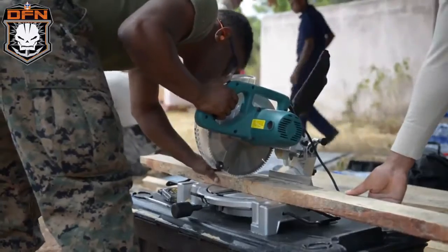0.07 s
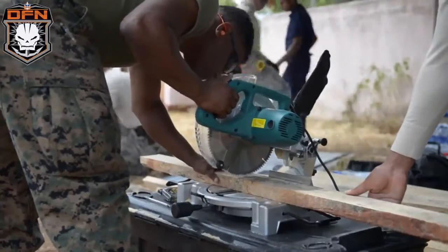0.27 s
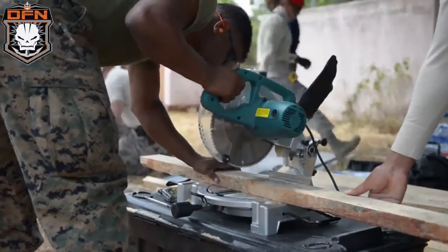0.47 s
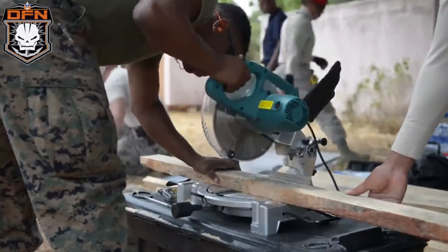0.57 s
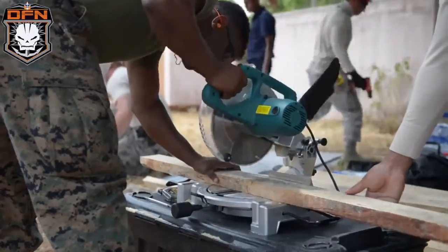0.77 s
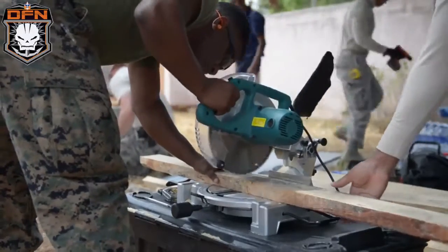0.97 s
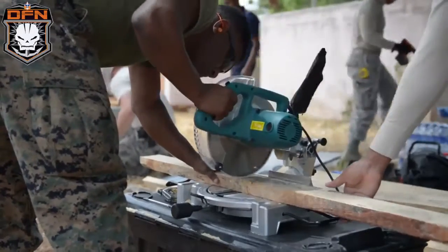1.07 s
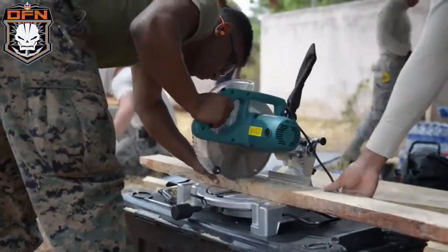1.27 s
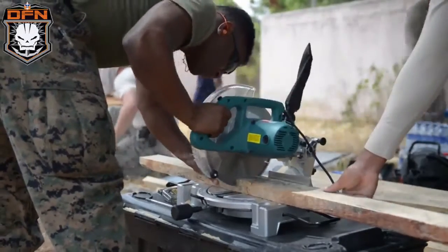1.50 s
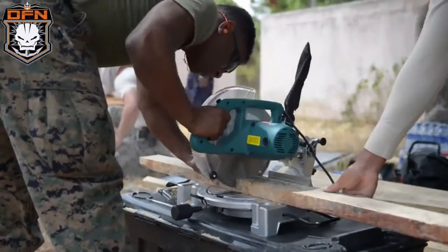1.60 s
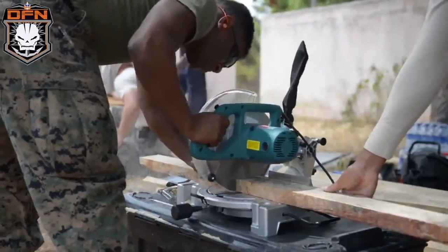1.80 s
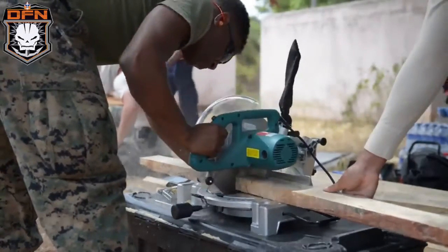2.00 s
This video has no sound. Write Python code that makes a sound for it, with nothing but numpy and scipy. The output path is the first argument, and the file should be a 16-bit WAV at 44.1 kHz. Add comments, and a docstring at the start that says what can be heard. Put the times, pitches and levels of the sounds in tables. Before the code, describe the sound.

An electric miter saw starts up and cuts through a wooden board outdoors.

```python
"""A low outdoor rumble, then an electric miter saw clatters into life and bites through a wooden board.
The inrush current rattles the gears at twice the mains rate, then the motor whines up to speed.
The teeth rasp through the wood, the blade rings, and two resonances fall as the cut deepens."""
import sys
import numpy as np
from scipy import signal
from scipy.fft import rfft, irfft
from scipy.io import wavfile
from scipy.ndimage import uniform_filter1d

SR = 44100
rng = np.random.default_rng(int(sys.argv[2]) if len(sys.argv) > 2 else 0)


def materialize(psi):
    """Save the field psi as 16-bit PCM at rate SR to the path in sys.argv[1].

    A 1-D psi becomes a single channel; in a 2-D psi each row is a channel.
    """
    bounded = np.clip(np.atleast_2d(psi).T, -1, 1)
    quanta = np.round(bounded * 32767).astype(np.int16)
    wavfile.write(sys.argv[1], SR, quanta)


N = 90228
T = np.arange(N) / SR
START_S = .612   # the motor kicks in

# rate of the motor's torque pulses, sagging under the inrush: time_s, rate_hz
TORQUE_PULSES = [(.612, 102.3), (.66, 98.4), (.72, 93.8), (.85, 98.24), (1.3, 103.4), (1.6, 101.8),
                 (2.05, 104.6)]
# the two resonances of the cut: time_s, lower_hz, lower_db, upper_hz, upper_db
KERF_RESONANCES = [(1.2, 2610, -54, 5900, -46.5), (1.36, 2340, -51, 5420, -42),
                   (1.41, 2200, -49, 4960, -41.5), (1.47, 1960, -42.5, 4510, -49.5),
                   (1.52, 1840, -46.5, 3840, -38.5), (1.58, 1655, -47, 3560, -46),
                   (1.66, 1365, -45, 3370, -45.5), (1.75, 1310, -44, 3230, -45.5),
                   (1.9, 1302, -43, 3130, -52.5), (2.05, 1314, -48, 3330, -39.5)]


def from_db(db):
    """Decibels to gain."""
    return 10 ** (np.asarray(db) / 20)


def rms_one(x):
    """Scale to unit rms."""
    return x / np.sqrt(np.mean(x ** 2) + 1e-20)


def in_time(rows):
    """Each column of a breakpoint curve at every sample."""
    time_s, *columns = np.transpose(rows)
    return [np.interp(T, time_s, column) for column in columns]


def white():
    """Unit white noise."""
    return rng.standard_normal(N)


def colour(x, spectrum):
    """Equalise x along a spectrum; white input keeps its power."""
    hz, db = np.transpose(spectrum)
    f = np.maximum(np.arange(N + 1) * SR / (2 * N), 1)
    gain = from_db(np.interp(np.log(f), np.log(hz), db)) * np.minimum(f / hz[0], 1) ** 2
    return irfft(rfft(x, 2 * N) * rms_one(gain))[:N]


def drift(hz):
    """Random wander of unit rms, mostly slower than hz."""
    f = np.arange(N // 2 + 1) * SR / N
    return rms_one(irfft(rfft(white()) / (1 + (f / hz) ** 2), N))


def cycles(hz):
    """Cycles run through at a steady or moving rate."""
    return np.cumsum(hz * np.ones(N)) / SR


def tone(hz):
    """A steady or gliding sine of unit rms."""
    return np.sqrt(2) * np.sin(2 * np.pi * cycles(hz))


def resonate(x, hz, width_hz):
    """A steady or moving resonance; white input keeps its power."""
    r, turn = np.exp(-np.pi * width_hz / SR), np.exp(2j * np.pi * cycles(hz))
    return np.real(turn * signal.lfilter([np.sqrt(2 * (1 - r * r))], [1, -r], x / turn + 1e-18))


def peak(x, hz, width_hz):
    """A resonance applied twice, for steep flanks; white input keeps its power."""
    r, turn = np.exp(-np.pi * width_hz / SR), np.exp(2j * np.pi * cycles(hz))
    return np.real(turn * signal.lfilter([(2 * (1 - r)) ** 1.5], [1, -2 * r, r * r], x / turn + 1e-18))


def lulls():
    """Gain that ducks the broad rush for an instant, four times during the cut."""
    # dips in level: centre_s, half_width_s, depth_db
    dips = [(1.385, .012, 12), (1.664, .011, 15), (1.769, .014, 17), (1.938, .011, 13)]
    return from_db(-sum(db * np.exp(-((T - s) / width) ** 4) for s, width, db in dips))


def site():
    """Low outdoor rumble, work-site bustle and the wavering drone of a distant machine."""
    # swells of the rumble: time_s, level_db
    rumble_level = [(0, -53.5), (.18, -54), (.25, -49), (.4, -51.5), (.55, -52.5), (.72, -54.5), (.95, -52),
                    (1.18, -65.5), (1.3, -49.5), (1.43, -47.5), (1.58, -66.5), (2.05, -63)]
    # spectra of rumble and bustle: freq_hz, density_db
    rumble_spectrum = [(25, -1), (52, 4.5), (80, 3), (110, -8), (160, -12.5), (400, -54.5)]
    bustle_spectrum = [(110, 0), (200, -6.5), (320, -5), (450, -11.5), (830, -11.5), (1150, -8.5),
                       (1400, -19), (3600, -21.5), (5000, -29.5), (7000, -35.5), (10000, -42.5),
                       (15000, -50)]
    # the machine's tones: pitch_hz, level_db
    drone_tones = [(533, -74.5), (786, -75), (1147, -70)]
    drone = sum(from_db(db) * tone(hz * (1 + .011 * drift(26))) for hz, db in drone_tones)
    rumble = from_db(in_time(rumble_level)[0]) * colour(white(), rumble_spectrum)
    return from_db(-60.5) * colour(white(), bustle_spectrum) + rumble + drone


def housing_rattle(knocks, age_s):
    """The knocking gears ring the housing; the rattle holds until the inrush ends, then dies."""
    # housing modes: pitch_hz, width_hz, gain_db
    modes = [(810, 210, -10), (1200, 81, -33), (1450, 50, -21), (1945, 150, -12.5), (2410, 47, -15.5),
             (2740, 120, -23.5), (3610, 100, -18), (4000, 110, -30)]
    hold_s = .12
    drive = knocks * from_db(-37 + 2 * age_s - 81 * np.maximum(age_s - hold_s, 0))
    rattle = sum(from_db(db) * resonate(drive * white(), hz, width) for hz, width, db in modes)
    return signal.sosfilt(signal.butter(4, 4700, fs=SR, output="sos"), rattle)


def gear_case(pulse, rate_hz, strength, age_s):
    """The main blow of each knock lands slightly off the beat and rings the gear case."""
    # gear case modes: pitch_hz, width_hz, gain_db
    modes = [(751, 168, -2), (872, 112, -1.5)]
    jitter_s = .00025
    blow_count = np.maximum.accumulate(np.ceil(pulse + rate_hz * jitter_s * abs(drift(50))))
    blows = rms_one(np.diff(blow_count, prepend=0) * strength)
    ring = sum(from_db(db + 1.84 * drift(70)) * peak(blows, hz, width) for hz, width, db in modes)
    return from_db(-41.5 - 49.5 * age_s) * ring


def start_up():
    """The switch clicks; torque pulses knock the gears, with a fading hum and one low shudder."""
    # spectra of the gear clatter and the shudder: freq_hz, density_db
    clatter_spectrum = [(100, 8.5), (200, 5), (450, -19), (800, 0.5), (1200, -6), (2700, -11), (3900, -4.5),
                        (4800, -20.5), (8000, -23.5), (15000, -45)]
    shudder_spectrum = [(60, -32), (110, -23), (200, -2), (270, -4.5), (420, -6.5), (600, -18), (1500, -51)]
    switch_s, switch_decay_s, knock_decay_s = .593, .016, .0044
    rate_hz, = in_time(TORQUE_PULSES)
    powered = T >= START_S
    age_s = np.maximum(T - START_S, 0)
    pulse = cycles(rate_hz * powered)
    strength = from_db(1.84 * white())[pulse.astype(int)]   # one draw per knock
    knocks = rms_one(strength * np.exp(-(pulse % 1) / rate_hz / knock_decay_s)) * powered
    rattle = housing_rattle(knocks, age_s) + gear_case(pulse, rate_hz * powered, strength, age_s)
    fade = from_db(-30.5 * age_s)
    hum = from_db(-54) * fade * (np.sin(2 * np.pi * pulse) + from_db(3.5) * np.sin(4 * np.pi * pulse))
    click = from_db(-45.5) * (T > switch_s) * np.exp(-abs(T - switch_s) / switch_decay_s)
    clatter = colour(white() * (click + from_db(-44) * fade * knocks), clatter_spectrum)
    swell = np.exp(-.5 * ((T - .806) / .096) ** 2)
    shudder = from_db(-44.5) * colour(white() * knocks * swell, shudder_spectrum)
    return rattle + hum + clatter + shudder


def motor():
    """A rough whine climbs in pitch, and the wind of fan and blade grows with speed."""
    # run of the whine: time_s, pitch_hz, level_db
    whine_curve = [(.62, 910, -83), (.74, 1295, -51.5), (.81, 1670, -54), (.9, 1954, -50.5),
                   (1.0, 2080, -55), (1.1, 2290, -59), (1.18, 2430, -57), (1.31, 2510, -53),
                   (1.42, 2363, -54.5), (2.05, 2530, -59.5)]
    # its noisy partials: pitch_ratio, width_hz, gain_db
    partials = [(1, 120, -4.5), (1, 216, -1), (1.88, 170, -5.5), (2.08, 130, -7), (3.9, 1700, -12)]
    # fan and blade wind: freq_hz, density_db
    air_spectrum = [(80, -45), (200, 0.5), (400, -2), (900, 6), (1400, 2), (2500, 3.5), (4000, 2),
                    (5500, -5.5), (8500, -9.5), (10000, -18), (15000, -22)]
    hz, level_db = in_time(whine_curve)
    fade_in = np.clip((T - START_S) / .034, 0, 1)
    whine = sum(from_db(db) * peak(white(), ratio * hz, width) for ratio, width, db in partials)
    air = from_db(-47) * (hz / hz.max()) ** 1.35 * colour(white(), air_spectrum)
    return fade_in * (from_db(level_db) * whine + air * lulls())


def labouring(load, depth):
    """The motor hums under load, and a low, unsteady shake grows as the cut deepens."""
    # tones of the shake: pitch_hz, gain_db
    shake_tones = [(80, -4.5), (160, -2.5), (181, -4), (250, -10)]
    rate_hz, = in_time(TORQUE_PULSES)
    hum = from_db(-51.5 + 2 * drift(8.9)) * (tone(rate_hz) + from_db(-11) * tone(2 * rate_hz))
    shake = sum(from_db(db + 2.7 * drift(6.6)) * tone(hz + 2.8 * drift(17)) for hz, db in shake_tones)
    return load * hum + from_db(-51.5) * depth ** 2 * shake


def teeth(bite):
    """Each tooth tears out a chip of its own size: a fast train of noise bursts."""
    tooth_hz, chip_spread_db = 3190, 1
    tooth = cycles(tooth_hz * (1 + .02 * drift(20)))
    chips = from_db(chip_spread_db * white())[tooth.astype(int)] * np.exp(-(tooth % 1))
    return bite * rms_one(chips * white())


def blade_mode(force, hz, width_hz):
    """The contact wanders over the blade, so a mode is driven more, then less."""
    swell = rms_one(from_db(5 * np.tanh(drift(5))))
    return peak(force * swell, hz, width_hz)


def blade(bite):
    """The teeth set the blade ringing, with a shimmer of many high modes on top."""
    # blade modes: pitch_hz, gain_db
    modes = [(2030, -4), (2670, 1), (2820, -2), (3282, 5.5), (3688, -3), (5028, 2), (5340, 4), (5680, -5),
             (6100, -13), (6385, 10.5), (6659, 2), (8791, -14), (9329, -4), (12592, -12), (13022, -13)]
    force = teeth(bite)
    ring = sum(from_db(db) * blade_mode(force, hz, width_hz=46) for hz, db in modes)
    ring /= np.linalg.norm(from_db([db for hz, db in modes]))
    high_hz = np.linspace(5500, 14900, 48) * (1 + .008 * rng.standard_normal(48))
    shimmer = sum(blade_mode(force, hz, width_hz=52) for hz in high_hz) / np.sqrt(len(high_hz))
    return from_db(-46.5) * ring + from_db(-47.5) * shimmer


def kerf(bite):
    """Two resonances fall as the slot deepens; the upper one smears while it glides fast."""
    lower_hz, lower_db, upper_hz, upper_db = in_time(KERF_RESONANCES)
    glide_hz_per_s = uniform_filter1d(abs(np.gradient(upper_hz)) * SR, size=2000)
    upper_hz = upper_hz + .027 * drift(200) * glide_hz_per_s
    lower = from_db(lower_db) * peak(teeth(bite), lower_hz, width_hz=160)
    upper = from_db(upper_db) * peak(teeth(bite * lulls() ** .3), upper_hz, width_hz=315)
    return lower + upper


def board(bite, depth):
    """The board rings on the saw table from first contact and gains body as the cut deepens."""
    # body of the wood: freq_hz, density_db
    spectrum = [(60, 4), (150, 12), (240, 5), (480, 1.5), (700, 5.5), (900, 15), (1080, -8), (1500, 5.5),
                (2100, 2), (2700, 5.5), (4000, 6.5), (4600, -26), (12000, -32)]
    body = from_db(-43 + 15.5 * (depth - 1)) * colour(teeth(bite * lulls() ** .3), spectrum)
    return body + from_db(-51.5) * peak(teeth(bite), hz=844, width_hz=320)


def rasp(bite, depth):
    """The bright tearing of the teeth, which the wood shields as they sink in."""
    # tooth rasp: freq_hz, density_db
    spectrum = [(300, -21), (900, 2.5), (2000, -14), (3500, 2), (4700, -7), (6300, 7), (7200, -5),
                (8600, 1), (10200, -10), (12200, -7), (15000, -7.5)]
    return from_db(-42 - 2.5 * depth) * colour(teeth(bite * lulls()), spectrum)


def cut():
    """The teeth enter the wood with a force that flutters and swings once per turn of the blade."""
    # how hard the teeth bite: time_s, level_db
    bite_curve = [(1.185, -49), (1.215, -10), (1.27, -7), (1.34, -2), (1.43, -0.5), (1.62, -0.5),
                  (1.74, -.5), (1.9, -2), (2.0, -1), (2.05, -10)]
    contact_s, turn_hz = bite_curve[0][0], 79.7
    load = from_db(in_time(bite_curve)[0]) * (T > contact_s)
    kerf_hz = in_time(KERF_RESONANCES)[0]
    depth = (kerf_hz.max() - kerf_hz) / np.ptp(kerf_hz)   # 0 at the surface, 1 at the deepest
    flutter = from_db(1.17 * drift(55))
    wobble = 1 + .16 * np.sin(2 * np.pi * cycles(turn_hz * (1 + .035 * drift(11))))
    bite = load * flutter * wobble
    return rasp(bite, depth) + board(bite, depth) + kerf(bite) + blade(bite) + labouring(load, depth)


def scene():
    """The saw close by in the open air, in mono."""
    return (start_up() + motor() + cut() + site())[None]


def record(dry):
    """A steep low-pass takes off the very top."""
    cutoff_hz = 15100
    return signal.sosfilt(signal.ellip(12, .1, 80, cutoff_hz, fs=SR, output="sos"), dry)


dry = scene()
out = record(dry)
materialize(out)
```